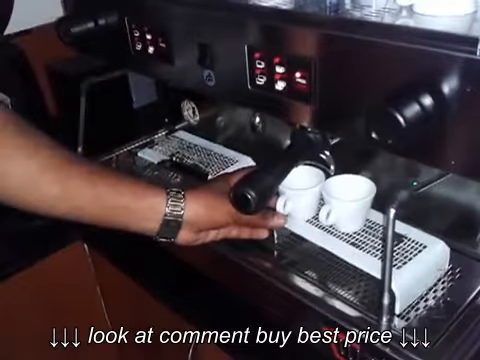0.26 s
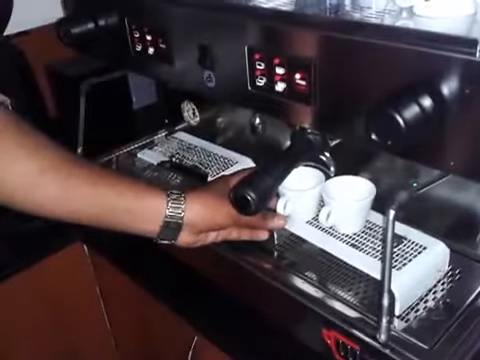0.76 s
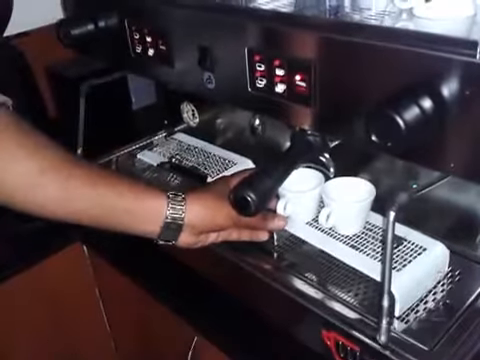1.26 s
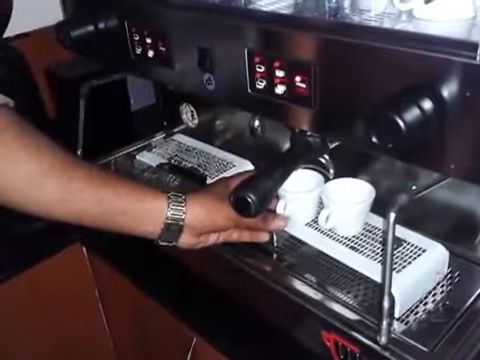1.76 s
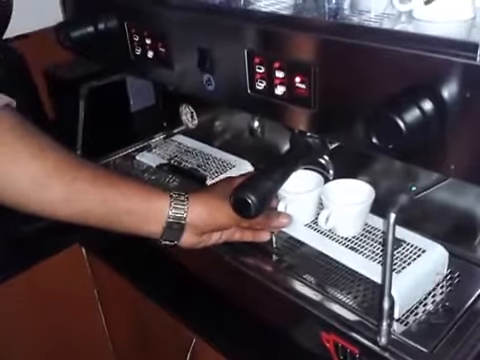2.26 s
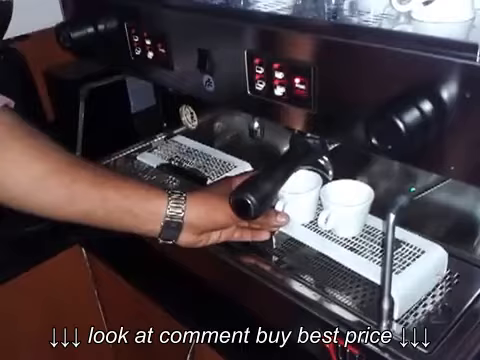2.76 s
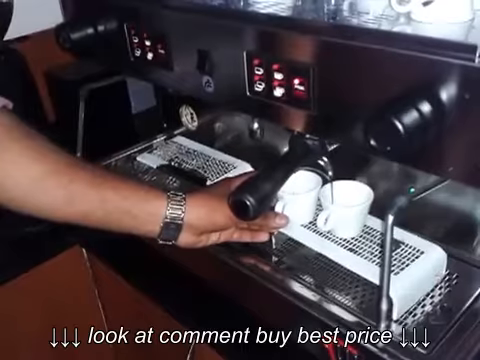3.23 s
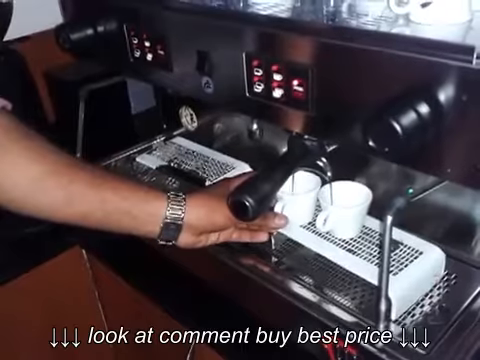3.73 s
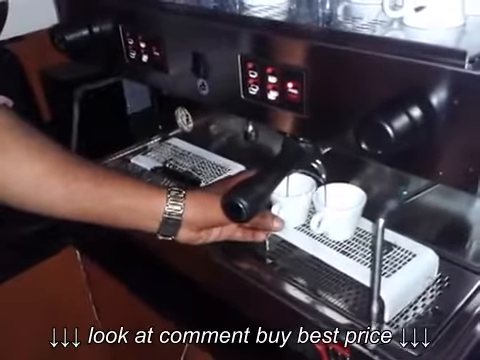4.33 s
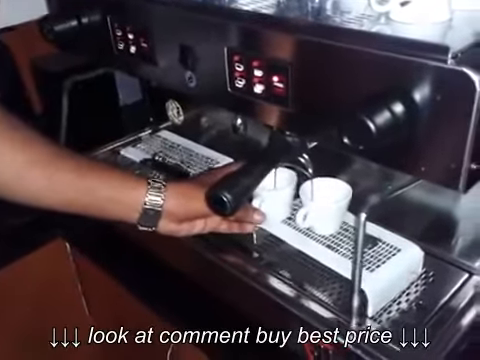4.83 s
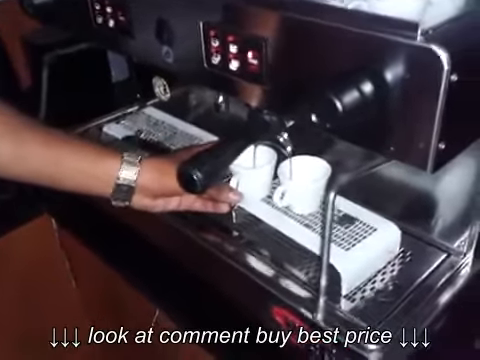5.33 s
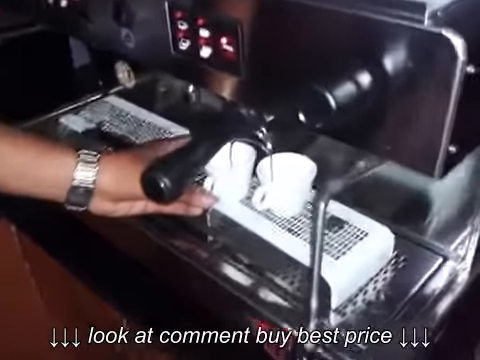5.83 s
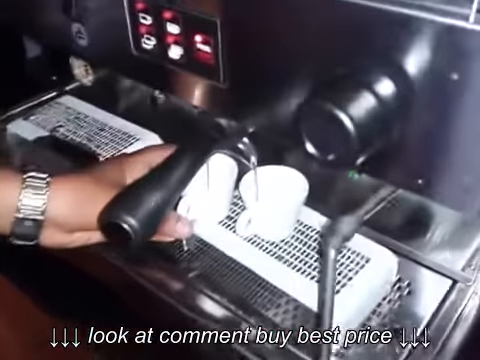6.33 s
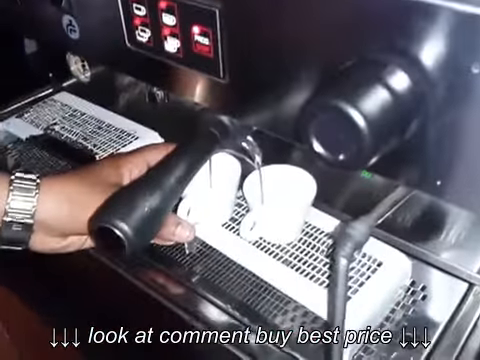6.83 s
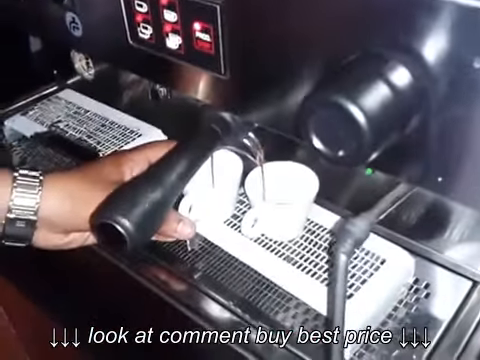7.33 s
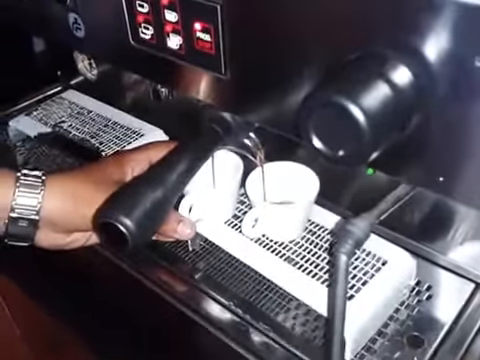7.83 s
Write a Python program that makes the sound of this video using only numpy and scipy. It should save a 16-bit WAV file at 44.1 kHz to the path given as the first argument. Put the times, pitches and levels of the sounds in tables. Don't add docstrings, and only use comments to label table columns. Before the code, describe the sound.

Heard close up in a reverberant cafe, a coffee machine drones under load: mains hum harmonics, rumbling case, high metallic clatter and thin hiss, never stopping. Small dry tray ticks are scattered through it. A little after four seconds, a cup strikes another with a sudden high ring far louder than the machine, bouncing twice almost at once. The tone shifts slightly as the microphone moves nearer.

```python
import sys
import numpy as np
from scipy import signal
from scipy.fft import rfft, irfft, next_fast_len
from scipy.io import wavfile
from scipy.ndimage import uniform_filter1d, map_coordinates

SR = 44100
rng = np.random.default_rng(int(sys.argv[2]) if len(sys.argv) > 2 else 0)


def volts_from_db(level):
    exponent = np.asarray(level, float) / 20
    return 10 ** exponent


def output_pcm(signal):
    pcm = np.clip(np.atleast_2d(signal).T, -1, 1) * 32767
    wavfile.write(sys.argv[1], SR, np.round(pcm).astype(np.int16))


N = 356328
T = np.arange(N) / SR

PULL_HZ, SHAFT_HZ = 100.245, 23.885
VANES = 4

# freq_hz, t60_s
ROOM_DECAY = [(500, .5), (6000, .45), (12000, .3)]
# start_s, peak_db, pitch_hz
TRAY_TICKS = [(0.845, -35, 9000), (1.6666, -30, 7160), (1.7095, -31, 7200), (1.9619, -32, 8550),
              (2.604, -33, 9030), (2.7062, -28, 9030), (2.8938, -30, 9090), (3.6511, -35, 9080),
              (3.8596, -32, 9020), (4.1949, -29, 9170), (4.355, -29, 7090), (4.8723, -30, 8600),
              (7.0918, -28, 7580), (7.7104, -31, 7090)]
# start_s, level_db
CUP_CONTACTS = [
    (4.3445, -4.5),
    (4.3553, -8),
    (4.3668, -10.5),
]
# pitch_hz, level_db, t60_s
CUP_MODES = [(5976, 2.5, .3), (6028, 1.5, .25), (6472, -1.5, .3), (10740, -40, .3), (7060, -33, .2)]
# time_s, place_index
WALK = [(0, 0.5), (1.6, 0), (2.2, 1.5), (3.3, 0.5), (3.8, 2), (5, 2), (5.6, 3), (6.4, 3), (6.7, 5),
        (8.1, 4)]
# pull_multiple, level_db at each of places 0 to 4
BUZZ_LINES = [(1, -63.5, -63, -63.5, -63.5, -61), (2, -59.5, -54.5, -53, -60.5, -58.5),
              (3, -41.5, -43, -42, -43.5, -43), (4, -41.5, -47.5, -46, -49.5, -46),
              (5, -58, -48, -50.5, -43, -39.5), (6, -43, -44.5, -42, -41.5, -46),
              (7, -44, -45, -41.5, -40.5, -49), (8, -44, -44, -44.5, -42.5, -44),
              (9, -46.5, -47, -49.5, -43, -55), (10, -56, -53, -63, -72, -65),
              (11, -50, -51, -54, -63, -52), (12, -49, -49.5, -50, -51, -49.5),
              (13, -49, -49, -44.5, -53, -49), (14, -65, -60, -58, -65, -60),
              (15, -51, -55, -49, -48.5, -47), (16, -50, -58, -64, -53, -54),
              (17, -56, -58, -49, -55, -48.5), (18, -47.5, -54, -51.5, -53, -68),
              (19, -57, -59, -53, -51.5, -58), (20, -55, -51, -60, -57, -61), (21, -52, -63, -60, -70, -61),
              (22, -49, -62, -53, -62, -54), (23, -61, -56, -53, -68, -66), (24, -56, -74, -62, -73, -69)]
# pull_multiple, shaft_multiple, level_db
SIDEBAND_LINES = [(2.5, 0, -68), (2.0, 3, -60), (3.0, -1, -66.5), (3.0, 1, -64), (4.0, -3, -56.5),
                  (0.0, 14, -62), (4.0, -2, -59), (0.0, 16, -56.5), (4.5, 0, -61), (0.0, 20, -56.5),
                  (6.0, -3, -56), (5.5, 0, -57), (0.0, 24, -59.5), (0.0, 25, -59.5), (6.5, 0, -59.5),
                  (6.0, 3, -56.5), (7.0, -1, -56), (8.0, -4, -49.5), (8.0, -3, -57), (0.0, 32, -50),
                  (7.0, 4, -57.5), (9.0, -1, -56), (9.0, 1, -55), (11.0, -3, -58), (11.0, -2, -53),
                  (12.0, 4, -53), (13.0, 3, -59), (14.0, -1, -50), (15.0, -1, -65), (16.0, -1, -53.5)]
# time_s, rumble_db, upper_case_db, clatter_db, hiss_db
PUMP_LOAD = [(0.0, -34.5, -37, -30, -42.5), (0.43, -36, -39.5, -30.5, -43.5),
             (0.94, -35.5, -36.5, -31, -43), (1.3, -36, -37, -28.5, -43.5), (1.66, -37.5, -37, -30.5, -45),
             (1.86, -34, -37.5, -30, -42), (2.09, -35.5, -39.5, -32, -45), (2.32, -35.5, -38.5, -31.5, -45),
             (2.95, -35, -39, -31, -44.5), (3.28, -33, -39.5, -29.5, -43), (3.56, -37, -39, -33, -45.5),
             (4.03, -36, -39.5, -31, -44.5), (4.3, -37.5, -39, -32, -47), (4.57, -35.5, -38, -30.5, -44),
             (4.73, -36.5, -39, -31, -44), (4.88, -36.5, -39.5, -32, -45), (5.47, -36, -38, -31, -44),
             (5.74, -34.5, -38, -30, -43.5), (6.21, -34.5, -37, -31, -44), (6.55, -35, -36, -30, -44),
             (6.88, -34.5, -38.5, -30.5, -44.5), (7.18, -32.5, -37.5, -31.5, -44.5),
             (7.47, -33.5, -38, -29.5, -42.5), (7.79, -36, -38.5, -32, -45), (8.08, -33, -38, -30, -44)]
# freq_hz, level_db
RUMBLE_COLOUR = [(25, -48), (60, -46), (100, -24.5), (150, -20.5), (200, -11), (300, -6), (500, -1.5),
                 (800, 2), (1200, -4.5), (1800, -15), (3000, -47)]
# freq_hz, level_db
UPPER_COLOUR = [(500, -51), (900, -12.5), (1300, -5), (1700, -1.5), (2100, -5), (2600, -5), (3300, -1),
                (4200, -6), (6000, -27)]
# freq_hz, level_db
CLATTER_COLOUR = [(2500, -31), (3500, -14), (4500, -5.5), (5200, -2.5), (5600, -1.5), (6100, -5),
                  (6800, -11.5), (7500, -16.5), (9000, -39)]
# freq_hz, level_db
HISS_COLOUR = [(3820, -32), (6500, -1.5), (6730, -7), (8480, -6.5), (9290, -7), (9790, -10), (11700, -14.5),
               (14400, -17), (15000, -25)]
# center_hz, width_hz, level_db
FAR_PANELS = [(4430, 60, -6), (5230, 60, -9), (5430, 85, -1.5), (5650, 60, 0), (5800, 70, -6.5),
              (5980, 90, -3), (7030, 40, -2)]
# center_hz, width_hz, level_db
NEAR_PANELS = [(4410, 40, -8), (5390, 120, -1), (5510, 40, -5), (5620, 40, -2), (5910, 50, 6.5),
               (6030, 60, -5.5)]
# time_s, far_share, near_share
PANEL_SHARES = [(0, 1, 0), (1.9, 1, 0), (2.2, .3, 0), (5.8, .3, .2), (6.3, 0, 1), (7.7, 0, 1), (8.1, 0, .5)]


def unit(x):
    return x / np.sqrt(np.mean(x ** 2) + 1e-20)


def along(points, hz):
    point_hz, value = np.transpose(points)
    return np.interp(np.log(hz + 1), np.log(point_hz + 1), value)


def curves(rows):
    time_s, *columns = np.transpose(rows)
    return [np.interp(T, time_s, column) for column in columns]


def wobble(rate_hz):
    knots = rng.standard_normal(int(N * rate_hz / SR) + 4)
    return map_coordinates(knots, [T * rate_hz])


def filtered(x, response):
    size = next_fast_len(N + SR // 2)
    hz = np.fft.rfftfreq(size, 1 / SR)
    return irfft(rfft(x, size) * response(hz), size)[..., :N]


def coloured(x, spectrum):
    return unit(filtered(x, lambda hz: volts_from_db(along(spectrum, hz))))


def resonant(x, peaks):
    def response(f):
        return sum(volts_from_db(db) * 1j * f * width / (center ** 2 - f * f + 1j * f * width)
                   for center, width, db in peaks)
    return filtered(x, response)


def patchy(patchy_db):
    z = signal.stft(rng.standard_normal(N), nperseg=512)[2]
    field = uniform_filter1d(rng.standard_normal(z.shape), 6, 0)
    field = uniform_filter1d(field, 12, 1)
    return signal.istft(z * volts_from_db(patchy_db * unit(field)), nperseg=512)[1][:N]


def comb(hz, count):
    return unit(sum(np.cos(2 * np.pi * (k * hz * T + rng.random())) for k in range(1, count + 1)))


def knocks(hz, sharp):
    return unit(np.exp(-sharp * (hz * T % 1)))


def sine(hz):
    return np.sqrt(2) * np.sin(2 * np.pi * (hz * T + rng.random()))


def room(x):
    hz, t, z = signal.stft(rng.standard_normal(SR // 2), SR, nperseg=256)
    decay = volts_from_db(-60 * t / along(ROOM_DECAY, hz)[:, None])
    tail = signal.istft(z * decay, SR, nperseg=256)[1]
    delayed = np.pad(x, (400, 0))
    return signal.fftconvolve(delayed, tail / np.linalg.norm(tail))[:N]


def tray():
    out, t = np.zeros(N + SR), T[:SR // 10]
    for start_s, peak_db, pitch_hz in TRAY_TICKS:
        ring = np.sin(2 * np.pi * pitch_hz * t) * volts_from_db(-60 * t / .05) * (1 - np.exp(-t / .001))
        spit = .6 * np.diff(rng.standard_normal(len(t) + 1)) * volts_from_db(-60 * t / .03)
        out[round(start_s * SR):][:len(t)] += volts_from_db(peak_db - 2) * (ring + spit)
    return out[:N]


def cups():
    out, t = np.zeros(N + SR), T[:SR // 2]
    ring = sum(volts_from_db(db - 60 * t / t60_s) * np.sin(2 * np.pi * hz * t) for hz, db, t60_s in CUP_MODES)
    ring = ring * (1 - np.exp(-t / .0015))
    for start_s, level_db in CUP_CONTACTS:
        tick = .08 * volts_from_db(-60 * t / .006) * rng.standard_normal(len(t))
        out[round(start_s * SR):][:len(t)] += volts_from_db(level_db) * (ring + tick)
    return out[:N]


def motor():
    place, = curves(WALK)
    out = np.zeros(N)
    for pull_multiple, *place_db in BUZZ_LINES:
        level_db = np.interp(place, np.arange(len(place_db)), place_db) + .8 * wobble(2)
        out += volts_from_db(level_db) * sine(pull_multiple * PULL_HZ)
    for pull_multiple, shaft_multiple, level_db in SIDEBAND_LINES:
        hz = pull_multiple * PULL_HZ + shaft_multiple * SHAFT_HZ
        out += volts_from_db(level_db + 2.5 * wobble(1)) * sine(hz)
    return out


def pump():
    rumble_db, upper_db, clatter_db, hiss_db = curves(PUMP_LOAD)
    pull = knocks(PULL_HZ, sharp=3)
    vane = knocks(VANES * SHAFT_HZ, sharp=6)
    turn = knocks(SHAFT_HZ, sharp=4)
    lattice = comb(PULL_HZ, count=24) * comb(SHAFT_HZ, count=4)
    surge = wobble(7)

    rumble = patchy(patchy_db=2.5) * (1 + .3 * pull) + .4 * lattice
    upper = patchy(patchy_db=1.5) * (1 + .2 * vane + .1 * pull) + .5 * lattice

    blows = patchy(patchy_db=0.5) * (1 + .3 * vane + .15 * pull)
    blows = blows * volts_from_db(.8 * surge + .6 * wobble(20))
    far, near = curves(PANEL_SHARES)
    panels = far * resonant(blows, FAR_PANELS) + near * resonant(blows, NEAR_PANELS)
    clatter = blows + 1.2 * panels

    hiss = patchy(patchy_db=0.9) * (1 + .2 * vane + .2 * pull + .15 * turn)
    hiss = hiss * volts_from_db(.7 * surge + 1.1 * wobble(15))

    return (volts_from_db(rumble_db - 4) * coloured(rumble, RUMBLE_COLOUR)
            + volts_from_db(upper_db + 1.5) * coloured(upper, UPPER_COLOUR)
            + volts_from_db(clatter_db + 0.83) * coloured(clatter, CLATTER_COLOUR)
            + volts_from_db(hiss_db + 3) * coloured(hiss, HISS_COLOUR))


def scene():
    struck = cups() + tray()
    mix = motor() + pump() + struck + volts_from_db(-5.5) * room(struck)
    return np.tile(mix, (2, 1))


def low_pass(x):
    return signal.sosfilt(signal.butter(12, 15470, fs=SR, output="sos"), x)


def record(dry):
    bent = dry + .01 * dry ** 2
    hardness, ceiling = 12, 1.02
    limited = bent / (1 + np.abs(bent / ceiling) ** hardness) ** (1 / hardness)
    return low_pass(limited)


dry = scene()
out = record(dry)
output_pcm(out)
```